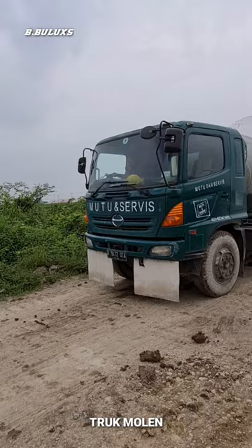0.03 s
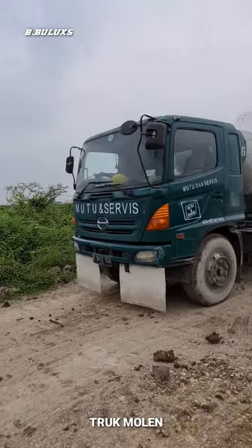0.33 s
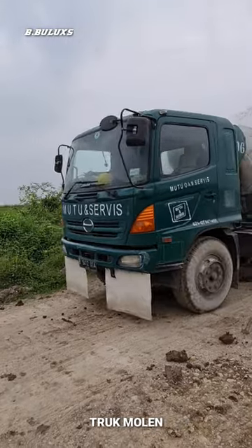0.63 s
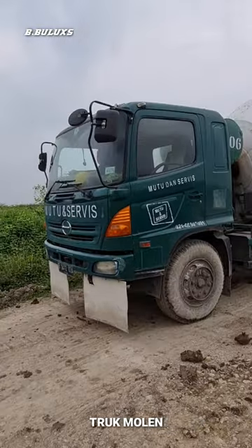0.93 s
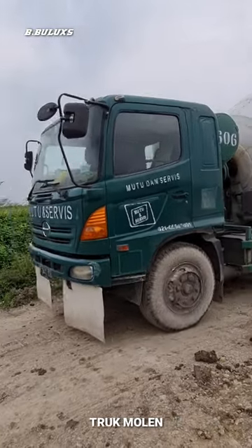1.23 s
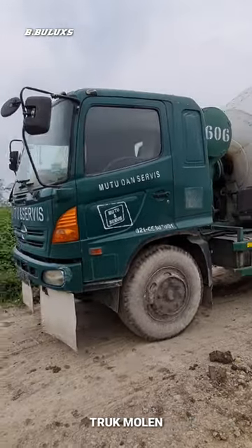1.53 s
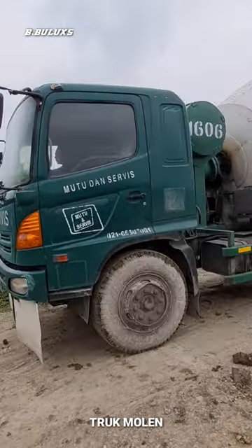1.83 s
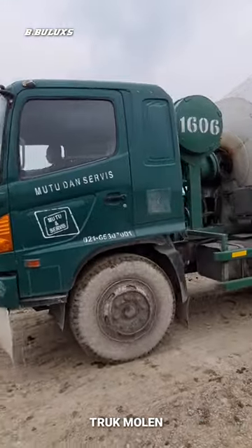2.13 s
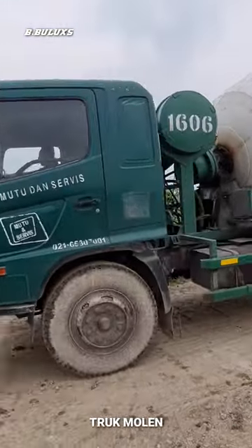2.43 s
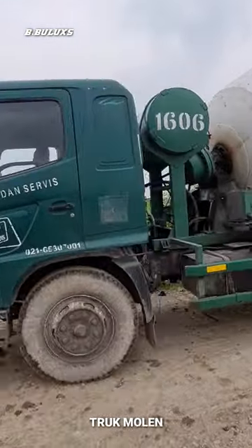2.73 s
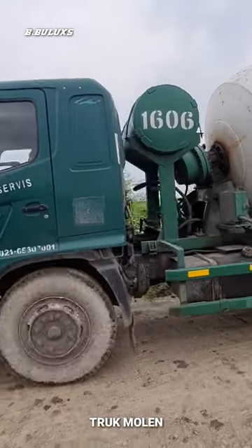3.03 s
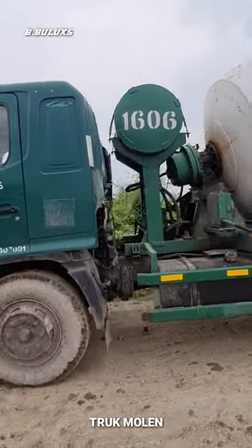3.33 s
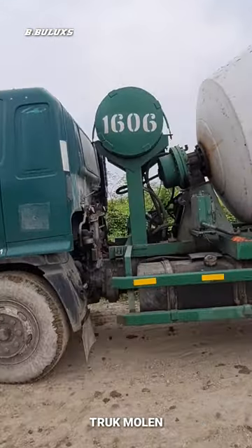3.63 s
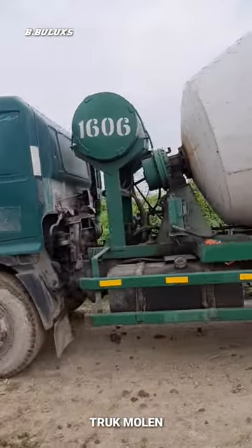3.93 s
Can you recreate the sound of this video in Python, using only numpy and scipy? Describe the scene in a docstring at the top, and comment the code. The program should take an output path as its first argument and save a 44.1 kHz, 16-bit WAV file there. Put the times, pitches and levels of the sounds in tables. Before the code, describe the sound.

A diesel truck idles with a deep, steady boom and metallic clatter. Shoes scuff the grit of a dirt road as the microphone moves along the cab, and near the end one short hiss of air escapes.

```python
"""A diesel mixer truck idles, its exhaust booming at the firing rate, as someone walks along the cab
towards the engine bay. The block rumbles and clatters with each firing, and its metal rings.
A second, weaker drone beats against the boom, then rises; a faint hum comes and goes.
Shoes scuff the grit of the dirt road, and near the end the air system blows off one short hiss."""
import sys
import numpy as np
from scipy import signal
from scipy.fft import rfft, irfft
from scipy.io import wavfile

SR = 44100
rng = np.random.default_rng(int(sys.argv[2]) if len(sys.argv) > 2 else 0)


def wav_record(signal):
    """Record a signal, one row per channel, as 16-bit PCM in the file named by sys.argv[1]."""
    frames = np.transpose(np.atleast_2d(signal))
    bounded = np.clip(frames, -1, 1)
    # unit amplitude maps onto the largest positive 16-bit level
    quanta = np.round(bounded * 32767).astype(np.int16)
    wavfile.write(sys.argv[1], SR, quanta)


N = 176400
T = np.arange(N) / SR

# idle: t/s, firing rate/Hz, boom level/dB
IDLE_TRACK = [(0.1, 54.7, -19.5), (0.35, 55.7, -23), (0.65, 55.4, -19.5), (0.85, 56, -22.9),
              (1.05, 53.2, -20.5), (1.35, 56, -21), (1.6, 53.1, -21), (1.9, 56.1, -21), (2.2, 54.3, -21),
              (2.45, 53.7, -20), (2.68, 56.4, -25), (2.9, 53.3, -23), (3.1, 55.5, -23), (3.5, 53.4, -22),
              (3.8, 53.3, -22.0), (4.0, 50.4, -19.5)]
# exhaust overtones: order, level/dB re fundamental
EXHAUST_OVERTONES = [(2, -21.5), (3, -25), (5, -33), (6, -34)]
def exhaust():
    """One pressure pulse per firing makes a deep boom."""
    return tone(IDLE_TRACK, EXHAUST_OVERTONES, flutter=0.62, flutter_hz=9.5)


# engine along the walk: t/s, rumble/dB, clatter/dB, jangle/dB, ticking/dB
WALK_LEVELS = [(.1, -33, -32.2, -44, -51), (.7, -31.5, -31, -42, -51), (1.4, -30, -30, -42, -48.5),
               (2.1, -29, -27.5, -39.5, -47), (2.5, -30, -27.5, -41, -46), (3.0, -29, -28, -42, -47.5),
               (3.5, -29, -29, -41.5, -47), (3.75, -26.5, -28.5, -42, -44), (3.88, -29, -32, -49.5, -51),
               (4, -29.5, -29, -44.5, -47)]
# layer spectra: f/Hz, relative level/dB
RUMBLE_SPECTRUM = [(15, -25), (35, -5), (60, -11), (90, -2.5), (135, -3.5), (185, -5), (255, 2),
                   (320, -1.4), (395, -3), (470, -9), (550, -16.5), (800, -35), (2000, -70)]
CLATTER_SPECTRUM = [(300, -42), (530, -8), (660, -1.5), (790, -.5), (900, 0.5), (1150, -0.5), (1380, -4),
                    (1800, -2), (2200, -3.5), (2500, -4), (2820, -7), (3050, -22.5), (3600, -50),
                    (7000, -66)]
JANGLE_SPECTRUM = [(2300, -38), (2950, -2), (3250, 2), (3700, 2), (3950, 0), (4400, -.5), (4650, -2.5),
                   (5200, -8.5), (7000, -20), (12000, -60)]
TICKING_SPECTRUM = [(2500, -41), (5000, 2), (6800, -1), (7750, 2), (8800, -4), (11000, -2.5), (12300, -6.5),
                    (15500, -15)]
# stereo likeness: f/Hz, L-R correlation (capped at 1)
ENGINE_LIKENESS = [(60, 0.5), (280, 1.5), (500, 0.4), (750, 1), (900, 0.63), (1080, 0.52), (1300, .25),
                   (2100, 0.37), (4000, 0.02), (12000, -0.05)]
# balance: f/Hz, L-R level/dB
ENGINE_BALANCE = [(60, -2), (130, 0.5), (380, -3), (600, 1.5), (760, 0.5), (1000, -2), (1400, -3),
                  (2150, -10.5), (2600, -5), (4300, -8), (5200, -1.5), (7700, -3.5), (9000, 1)]
# left lead: f/Hz, phase/rad
ENGINE_LEAD = [(520, 0), (900, -0.54), (1700, -0.43), (2150, 0.073)]
def engine_block():
    """Firings shake the block: unevenly chugging rumble, clatter, higher jangle, fine ticking."""
    chug = amp(1.15 * wander(rate_hz=10))
    knocks = firing_noise(decay_s=0.003, steady=0.97, stray=0.11)
    clatter = metalwork(ring(knocks, t60_s=0.079, share=0.53))
    thuds = firing_noise(decay_s=0.0042, steady=0.86, stray=0.089)
    rumble = chug * ring(thuds, t60_s=0.038, share=0.45)
    ticks = firing_noise(decay_s=0.0024, steady=1.6, stray=0.35)
    ticking = ring(ticks, t60_s=0.08, share=0.7)
    layers = [(rumble, RUMBLE_SPECTRUM), (clatter, CLATTER_SPECTRUM),
              (clatter, JANGLE_SPECTRUM), (ticking, TICKING_SPECTRUM)]
    stereo = per_bin(ENGINE_LIKENESS), per_bin(ENGINE_BALANCE), per_bin(ENGINE_LEAD)
    return sum(amp(curve(WALK_LEVELS, column)) * place(drive, spectrum, *stereo)
               for column, (drive, spectrum) in enumerate(layers, start=1))


# six-cylinder cycle: position/firings, relative level/dB
CYLINDER_KNOCKS = [(.8, -4), (1.7, -0.5), (2.8, -0.5), (3.8, -1), (4.8, -3), (5.8, -2.5)]
def firing_noise(decay_s, steady, stray, jitter_s=0.0012, scatter_db=1.3, strays_per_s=160):
    """Steady noise that flares at each cylinder's knock and at stray valve knocks."""
    firings = np.cumsum(curve(IDLE_TRACK)) / SR
    cylinders = len(CYLINDER_KNOCKS)
    cycles = np.arange(0, firings[-1] - cylinders / 2, cylinders)
    hits = np.zeros(N)
    for position, db in CYLINDER_KNOCKS:
        jitter, size = rng.standard_normal((len(cycles), 2)).T
        times = np.interp(cycles + position, firings, T) + jitter_s * jitter
        hits[(times * SR).astype(int) % N] += amp(db + scatter_db * size)
    hits += stray * rng.exponential(1, N) * (rng.random(N) < strays_per_s / SR)
    flare = signal.lfilter([1], [1, -np.exp(-1 / (decay_s * SR))], hits)
    return (steady + flare) * rng.standard_normal((2, N))


# upper metal modes: f/Hz, width/Hz, boost/dB
METAL_MODES = [(1900, 33, 3), (2197, 56, 3.5), (2734, 60, 3), (3210, 60, 3), (3770, 58, 1), (4150, 65, 4.5),
               (4430, 80, 4)]
# main ring of the knocks: t/s, f/Hz
MAIN_RING = [(.1, 1060), (1.2, 990), (2.2, 911.7), (2.85, 885), (3.2, 1008), (3.9, 890)]
def metalwork(pair, drift=0.0062, main_width_hz=106, main_boost_db=2.5):
    """The engine's metal resonates; its modes shift as the listener walks past."""
    modes = [(hz * (1 + drift * wander(rate_hz=2)), width, db) for hz, width, db in METAL_MODES]
    modes.append((curve(MAIN_RING), main_width_hz, main_boost_db))
    out = pair
    for hz, width, db in modes:
        carrier = np.exp(2j * np.pi * np.cumsum(hz) / SR)
        pole = np.exp(-np.pi * width / SR)
        # moving band-pass: shift down, low-pass, shift back
        baseband = signal.lfilter([1 - pole], [1, -pole], pair * carrier.conj())
        out = out + (amp(db) - 1) * 2 * (carrier * baseband).real
    return out


# drone: t/s, f/Hz, level/dB
DRONE_TRACK = [(0.1, 66.57, -28.5), (0.35, 67.36, -26), (0.55, 70.07, -33.5), (0.9, 66.45, -28.5),
               (1.25, 64.9, -31.5), (1.55, 63.67, -27.5), (1.85, 76.8, -32.5), (2.25, 80.9, -32),
               (2.7, 79.8, -32.8), (3.1, 85.1, -36), (3.4, 86.85, -32.5), (4.0, 85.5, -34.1)]
# drone overtones: order, level/dB re fundamental
DRONE_OVERTONES = [(2, -15.5), (3, -19), (4, -13), (5, -16.5)]
def second_drone():
    """A weaker drone, perhaps another engine, beats against the boom, then rises."""
    return tone(DRONE_TRACK, DRONE_OVERTONES, flutter=0.54, flutter_hz=9)


# air spectra: f/Hz, relative level/dB
JET_SPECTRUM = [(2500, -21), (5000, -4.5), (8150, -2.8), (8650, -12), (9200, -2), (10800, 1.6), (12500, 1),
                (15500, -0.5)]
VALVE_SPECTRUM = [(600, -18), (1400, -8), (1800, -3.5), (2150, -3), (2700, -4), (3300, -5), (4200, -2),
                  (5000, -8), (7000, -16), (10000, -37)]
# valve body modes: f/Hz, width/Hz, boost/dB
VALVE_BODY_MODES = [(2200, 69, 9.5), (3400, 70, 3.5), (4170, 60, 7)]
def blow_off():
    """The air jet opens first, then the valve body roars."""
    jet = place(rng.standard_normal((2, N)), JET_SPECTRUM, likeness=0.046, balance_db=-2.5)
    jet *= air_envelope(start_s=3.565, rise_s=0.036, hold_s=0.01, fall_db_per_s=158, level_db=-19.5)
    body = resonate(rng.standard_normal((2, N)), VALVE_BODY_MODES)
    valve = place(body, VALVE_SPECTRUM, likeness=0.046, balance_db=-5)
    valve *= air_envelope(start_s=3.576, rise_s=0.03, hold_s=0.024, fall_db_per_s=200, level_db=-20.4)
    return jet + valve


def air_envelope(start_s, rise_s, hold_s, fall_db_per_s, level_db, flutter=0.094):
    """Escaping air swells, holds and dies as the pressure drops."""
    swell = np.clip((T - start_s) / rise_s, 0, 1) ** 2
    fall_db = fall_db_per_s * np.maximum(T - start_s - rise_s - hold_s, 0)
    return swell * amp(level_db - fall_db) * (1 + flutter * wander(rate_hz=120))


# scuffs: t/s, length/s, level/dB
SHOE_SCUFFS = [(.435, .04, -43), (0.822, 0.062, -31.5), (1.087, .13, -30.5), (1.783, .11, -28.5),
               (1.895, 0.048, -37), (1.999, 0.12, -29.5), (2.235, 0.11, -33), (2.609, 0.072, -30),
               (2.755, 0.061, -33.5), (2.846, .05, -34)]
# grit: f/Hz, relative level/dB
GRIT_SPECTRUM = [(500, -33), (1500, 0.5), (2800, 3), (4200, -1), (5500, -11), (7000, -13), (7750, -8.5),
                 (8800, -20), (11000, -21), (15500, -34)]
def steps(grains_per_s=2500, spread_db=4, stone_width_hz=31, stone_boost_db=9):
    """Grit cracks under a sole that presses fast and lifts slowly; each scuff rings three new stones."""
    grains = rng.standard_normal((2, N)) * amp(spread_db * np.minimum(rng.exponential(1, N), 3))
    grains *= rng.random(N) < grains_per_s / SR
    rub = 0.32 * rng.standard_normal((2, N))
    crunch = ring(grains + rub, t60_s=0.036, share=0.76)
    crunch = place(crunch, GRIT_SPECTRUM, likeness=0.21, balance_db=-4)
    out = np.zeros((2, N))
    for start_s, length_s, db in SHOE_SCUFFS:
        span = (T >= start_s) & (T < start_s + length_s)
        stones = [(hz, stone_width_hz, stone_boost_db) for hz in rng.uniform(2494, 4815, 3)]
        press = np.sin(np.pi * ((T[span] - start_s) / length_s) ** 0.56)
        out[:, span] += amp(db) * press * unit(resonate(crunch[:, span], stones))
    return out


# hum: t/s, f/Hz, level/dB
HUM_TRACK = [(1.5, 136, -50), (1.8, 135, -39), (2.3, 132.2, -36.5), (2.55, 130.5, -39), (2.8, 129, -35),
             (3.05, 127, -35), (3.3, 127.7, -53)]
def cab_hum():
    """A faint pure tone beside the cab swells, sags in pitch and fades."""
    return tone(HUM_TRACK, lead_rad=0)


def tone(track, overtones=(), flutter=0, flutter_hz=1, lead_rad=0.39, balance_db=-2):
    """Partials on a pitch track; the overtones flutter, the fundamental leads on the left."""
    sides = np.array([[0.5], [-0.5]])
    phase = 2 * np.pi * np.cumsum(curve(track)) / SR
    out = np.cos(phase + sides * lead_rad)
    for order, db in overtones:
        gain = amp(db) * (1 + flutter * wander(flutter_hz))
        out += gain * np.cos(order * phase + 2 * np.pi * rng.random())
    return np.sqrt(2) * amp(curve(track, column=2) + sides * balance_db) * out


def ring(pair, t60_s, share, evenness=0.57):
    """A struck body rings briefly in a dense, fairly even cluster of modes."""
    tail = rng.standard_normal((2, 4096)) * amp(-60 * T[:4096] / t60_s)
    tail /= np.linalg.norm(tail, axis=1, keepdims=True)
    body = 1 + share * rfft(tail, N)
    return irfft(rfft(pair) * body / abs(body) ** evenness, N)


def resonate(pair, modes):
    """Boosts narrow, steady resonances."""
    hz = np.fft.rfftfreq(pair.shape[1], 1 / SR)
    body = 1 + sum((amp(db) - 1) / (1 + 2j * (hz - centre) / width) for centre, width, db in modes)
    return irfft(rfft(pair) * body, pair.shape[1])


def place(pair, spectrum, likeness, balance_db, lead_rad=0):
    """Colours two unrelated signals and blends them to stereo; mid rms 1."""
    common, separate = rfft(pair)
    likeness = np.clip(likeness, -1, 1)
    pan = amp(balance_db / 2) * np.exp(0.5j * lead_rad)
    left = common * pan
    right = (likeness * common + np.sqrt(1 - likeness ** 2) * separate) / pan
    out = irfft(np.array([left, right]) * amp(per_bin(spectrum)), N)
    return out / np.sqrt(np.mean(out.mean(0) ** 2))


def wander(rate_hz):
    """Random drift up to about rate_hz; rms 1."""
    rolloff = 1 + (np.fft.rfftfreq(N, 1 / SR) / rate_hz) ** 4
    return unit(irfft(rfft(rng.standard_normal(N)) / rolloff, N))


def curve(table, column=1):
    """Table column over time."""
    rows = np.array(table)
    return np.interp(T, rows[:, 0], rows[:, column])


def per_bin(table):
    """Table over log frequency, at every FFT bin."""
    hz, value = np.transpose(table)
    return np.interp(np.log(np.fft.rfftfreq(N, 1 / SR) + 1), np.log(hz), value)


def amp(db):
    """Decibels to gain."""
    return 10 ** (np.asarray(db) / 20)


def unit(x):
    """Scales to rms 1."""
    return x / np.sqrt(np.mean(x ** 2) + 1e-20)


def scene():
    """Truck, drone, blow-off, steps and hum together."""
    return exhaust() + engine_block() + second_drone() + blow_off() + steps() + cab_hum()


def record(dry, start_s=0.092, fade_s=0.001, cutoff_hz=15550):
    """The sound cuts in and is low-passed."""
    fade_in = np.clip((T - start_s) / fade_s, 0, 1)
    lowpass = signal.firwin(511, cutoff_hz, window=("kaiser", 9), fs=SR)
    return signal.oaconvolve(dry * fade_in, lowpass[None], "same")


dry = scene()
out = record(dry)
wav_record(out)
```